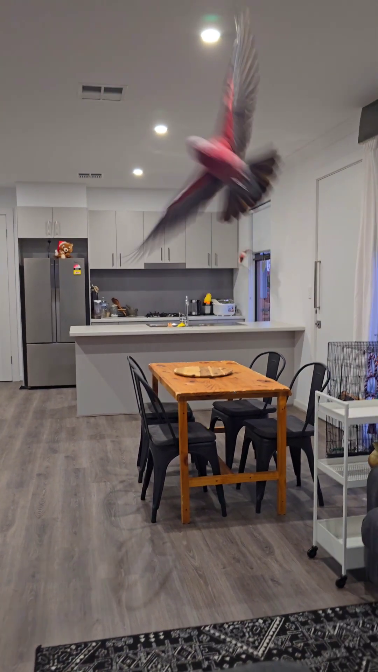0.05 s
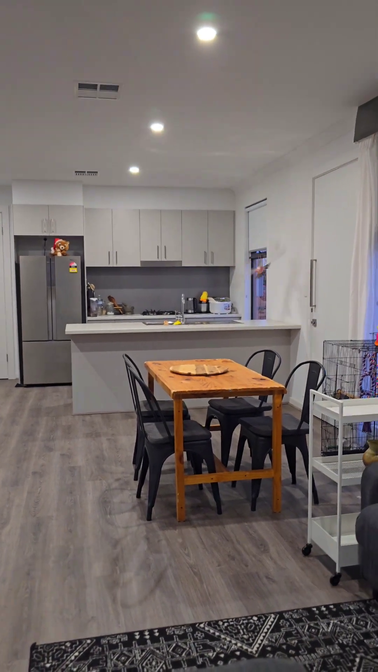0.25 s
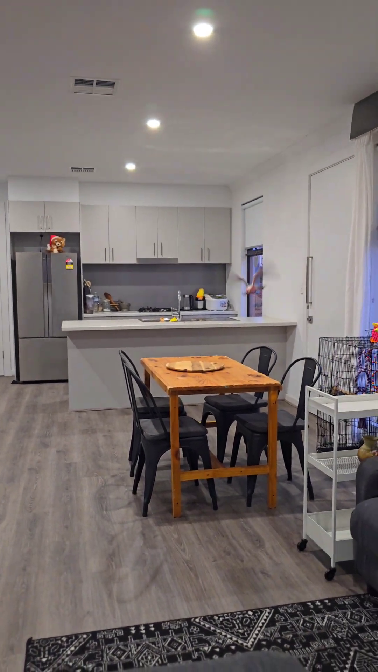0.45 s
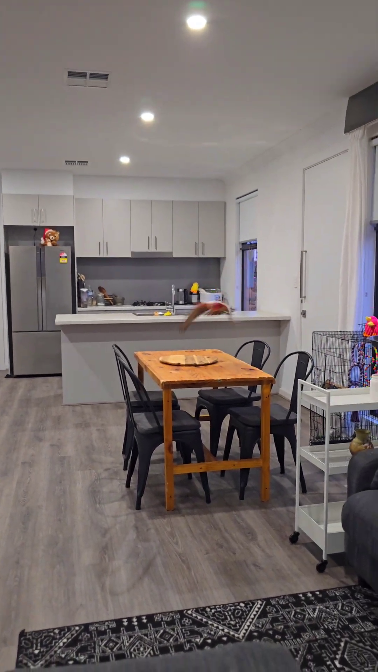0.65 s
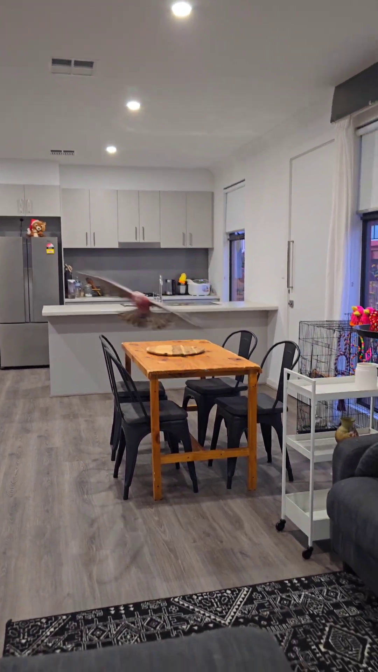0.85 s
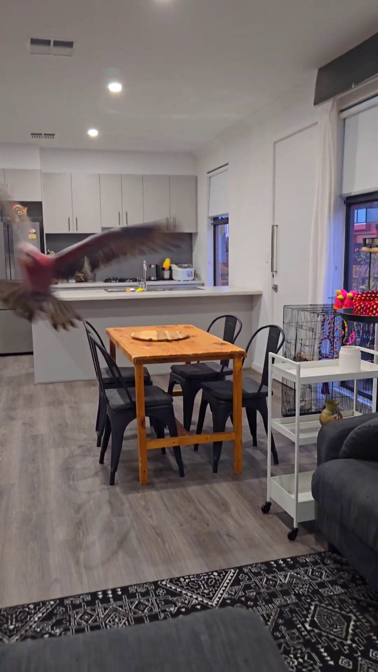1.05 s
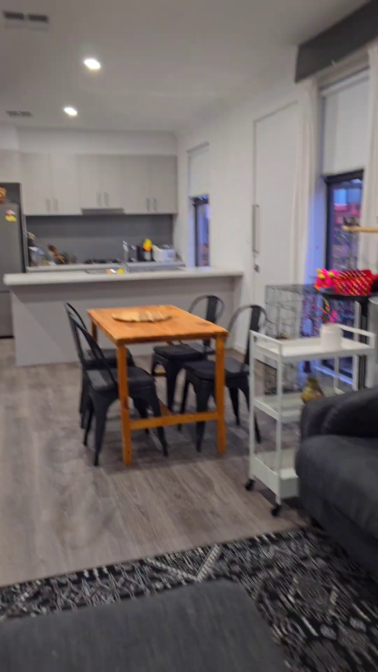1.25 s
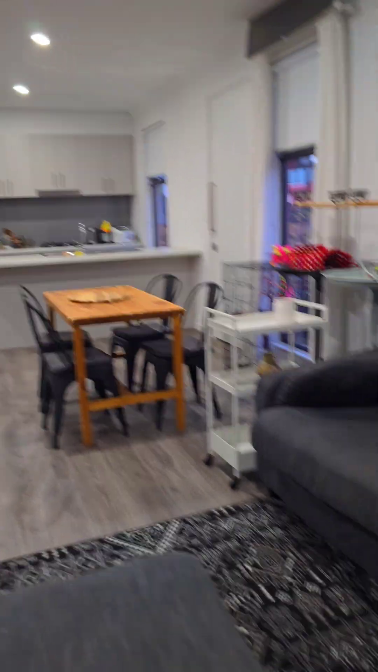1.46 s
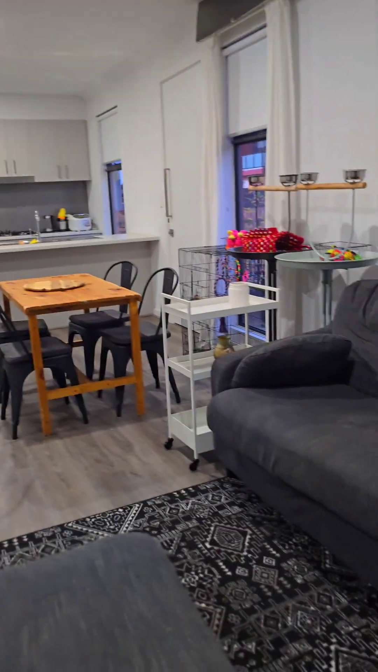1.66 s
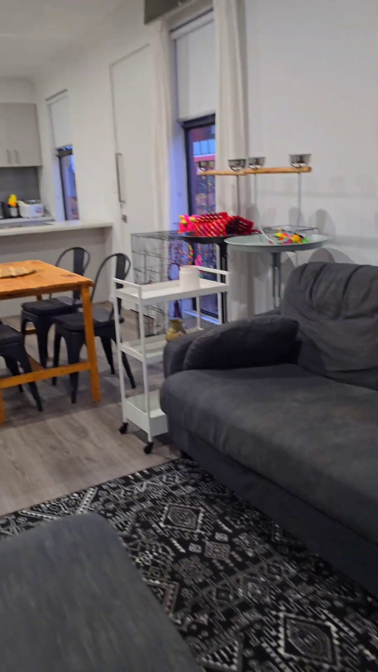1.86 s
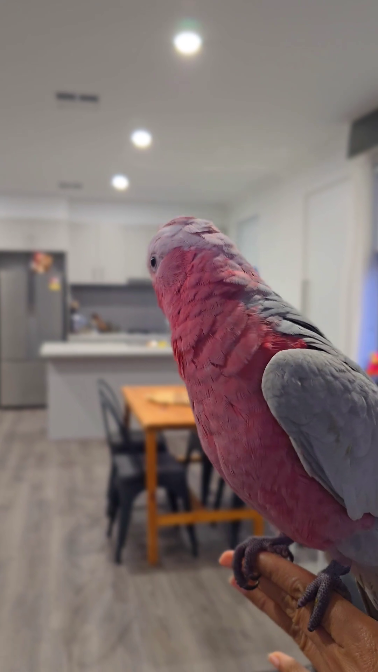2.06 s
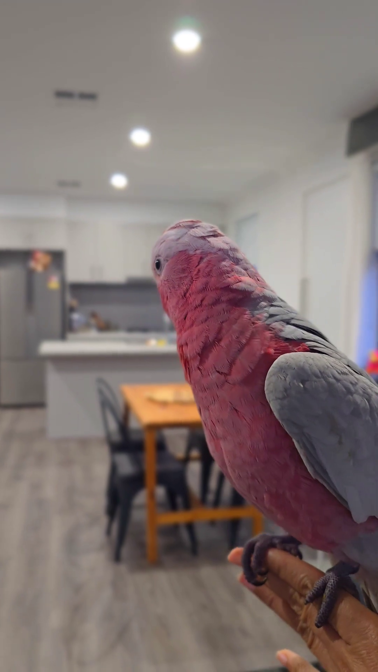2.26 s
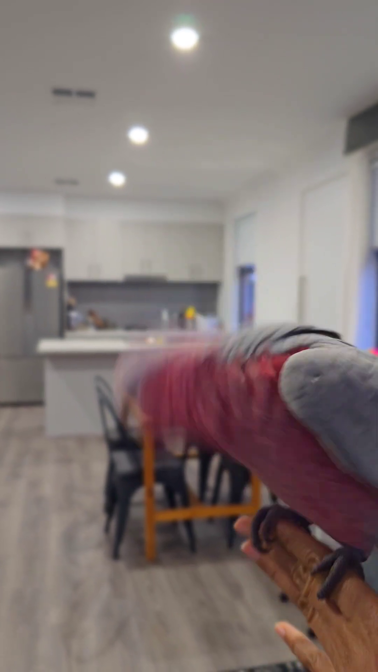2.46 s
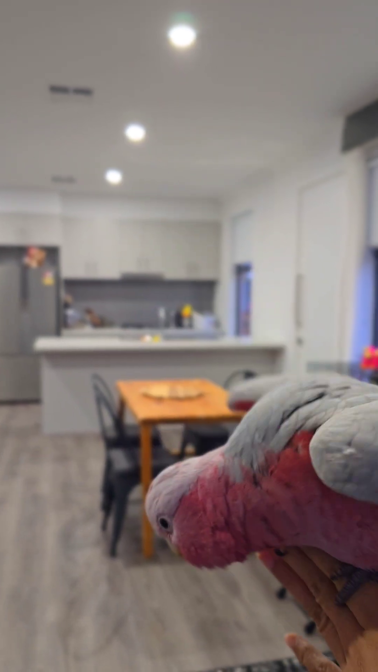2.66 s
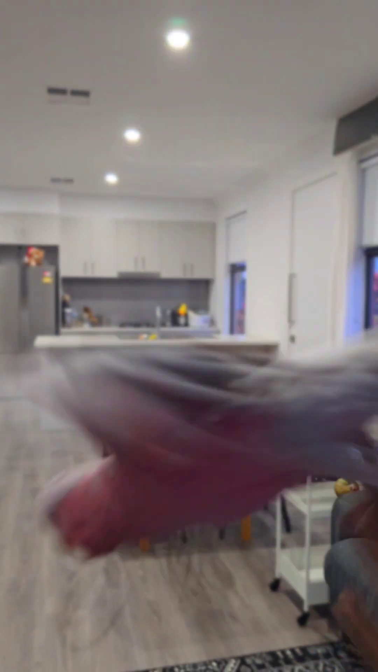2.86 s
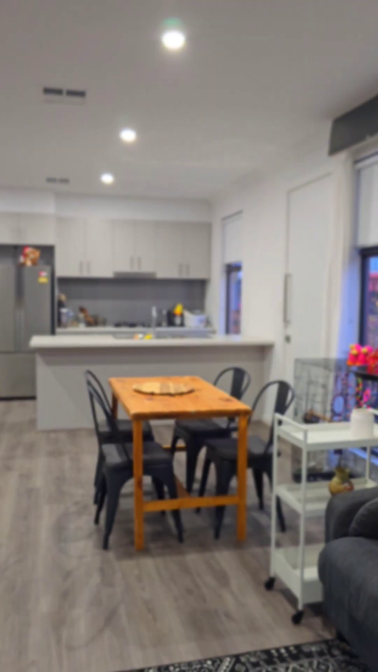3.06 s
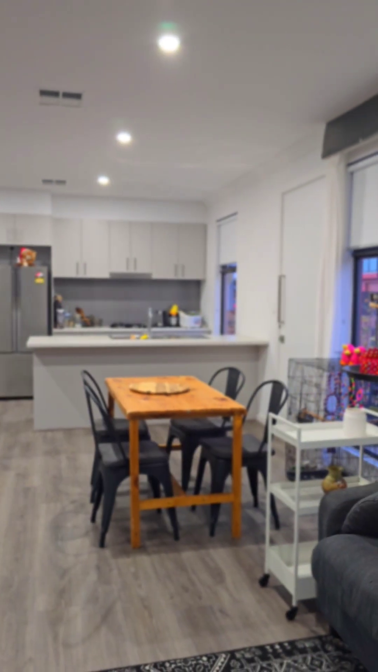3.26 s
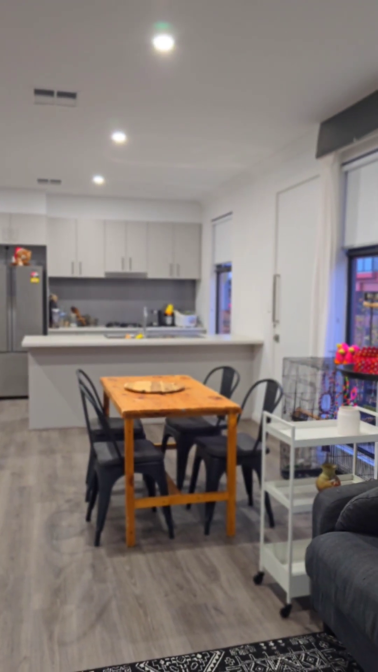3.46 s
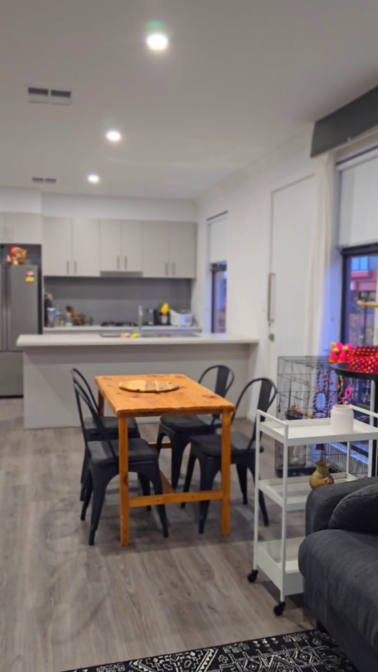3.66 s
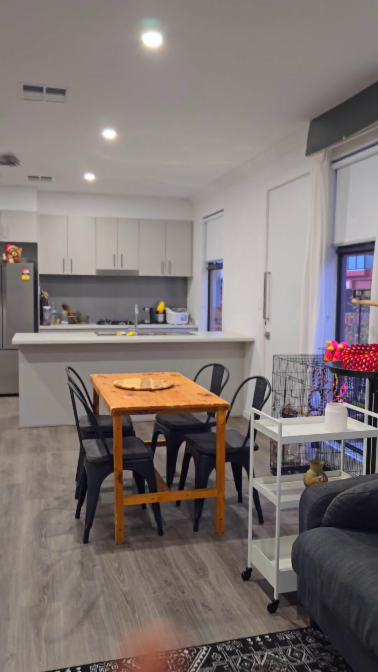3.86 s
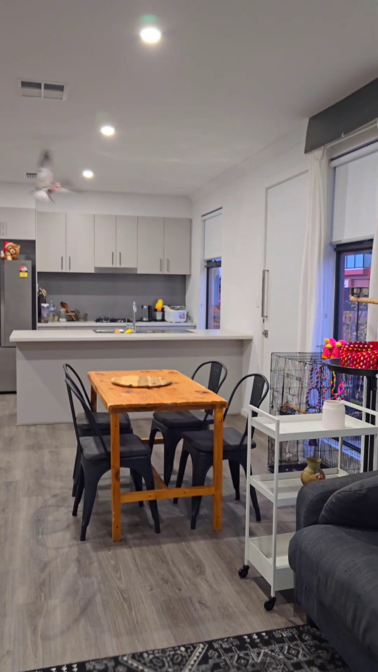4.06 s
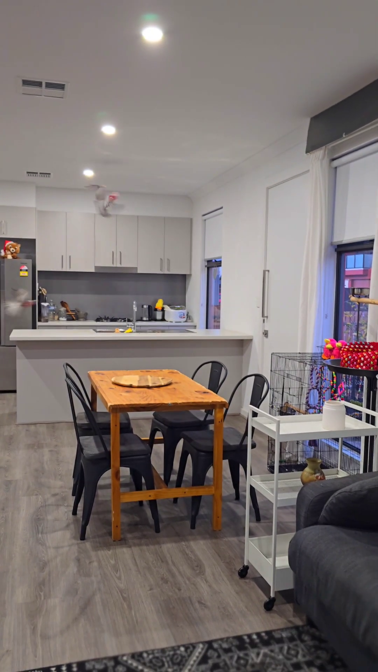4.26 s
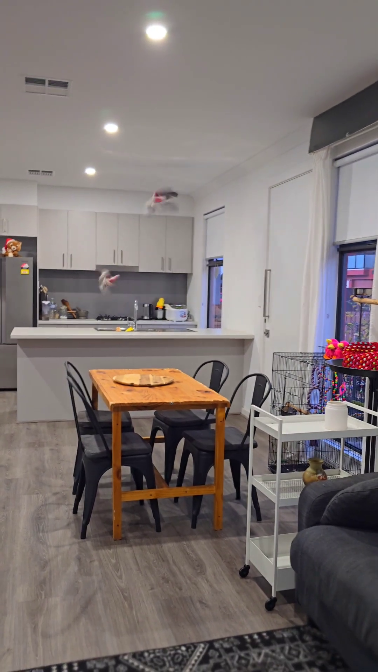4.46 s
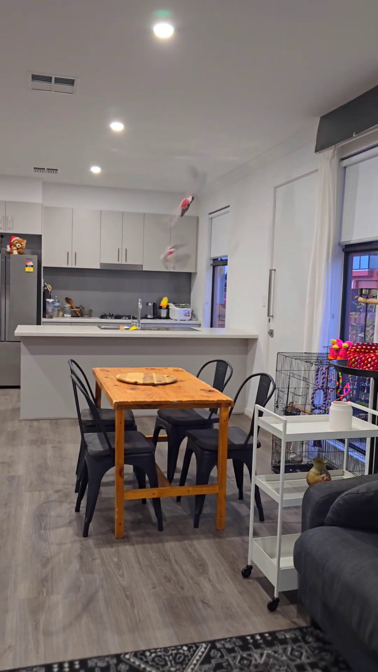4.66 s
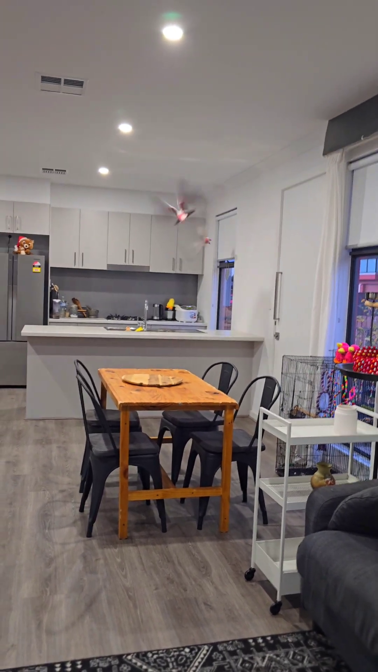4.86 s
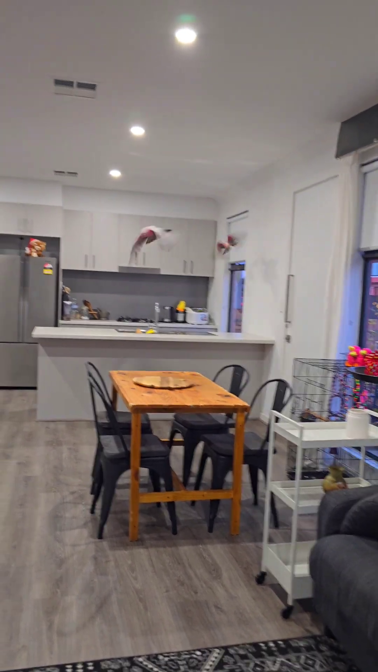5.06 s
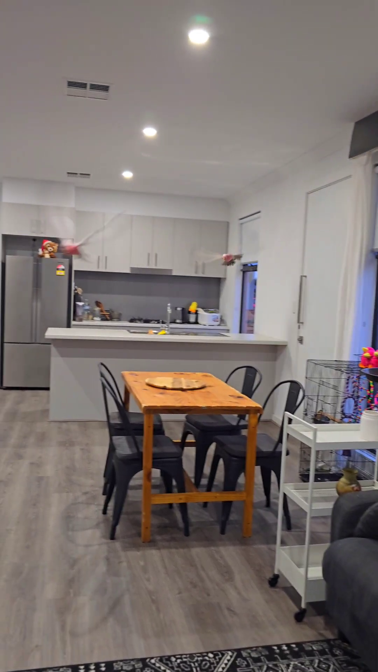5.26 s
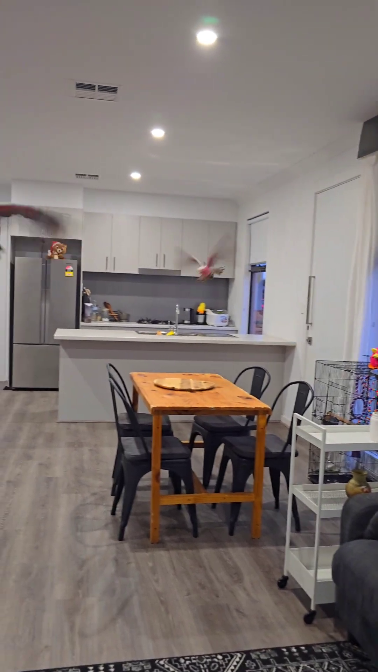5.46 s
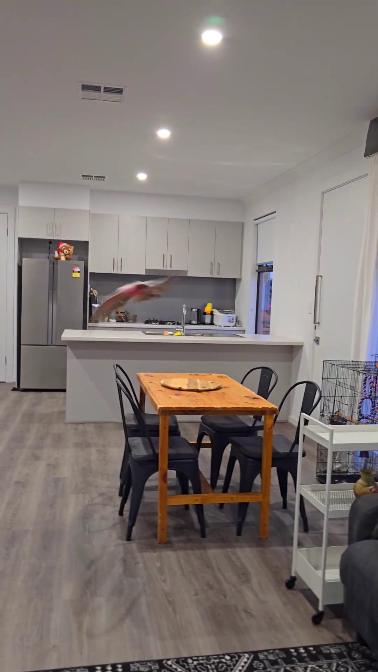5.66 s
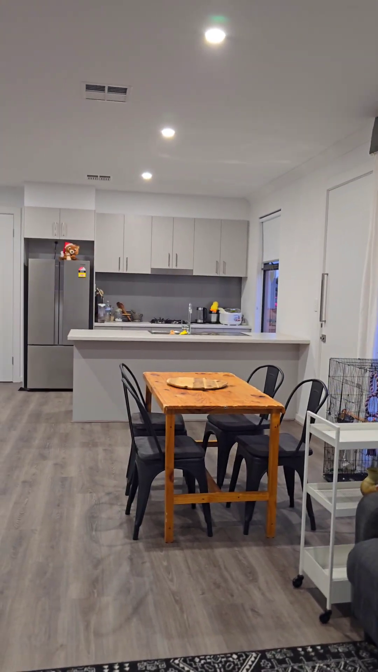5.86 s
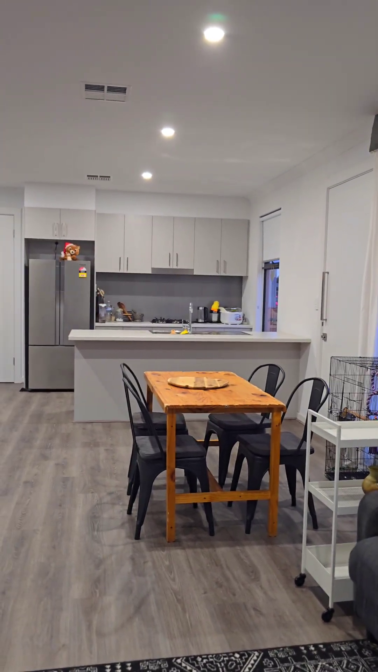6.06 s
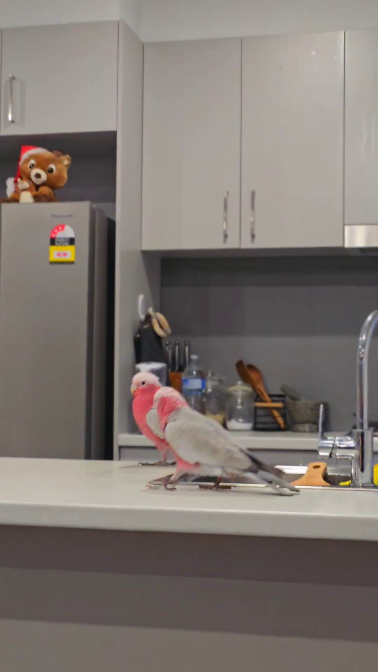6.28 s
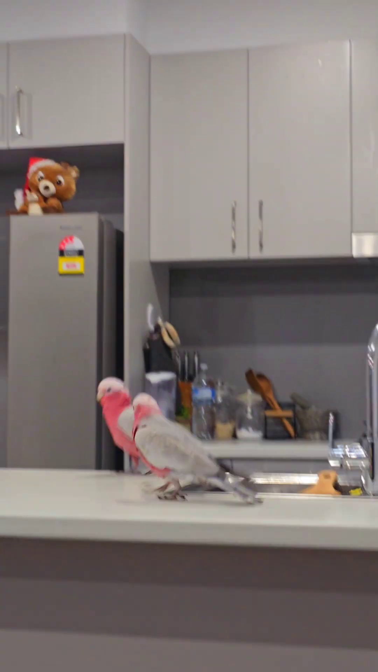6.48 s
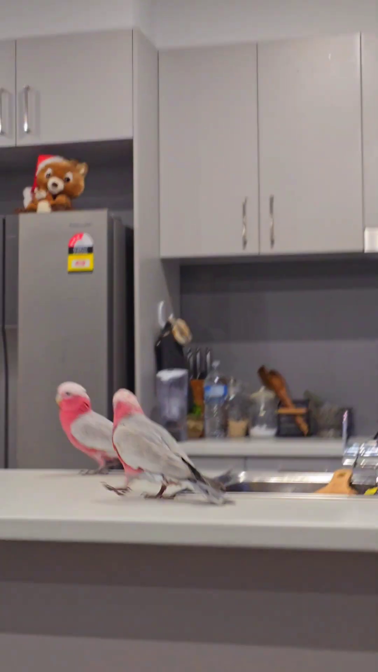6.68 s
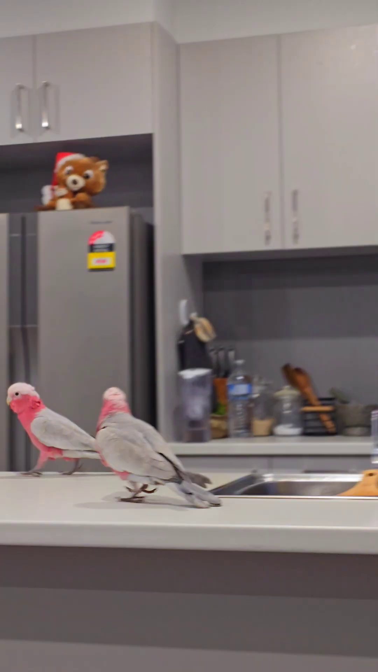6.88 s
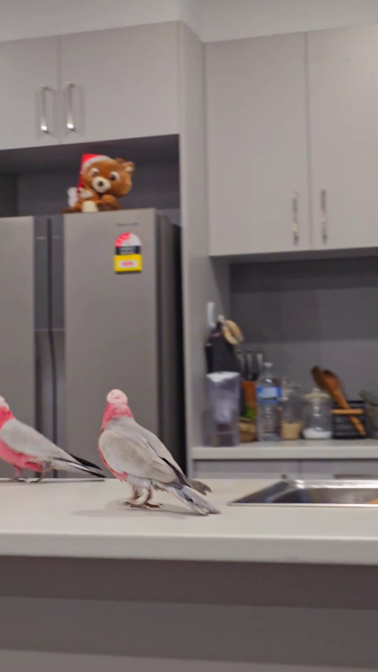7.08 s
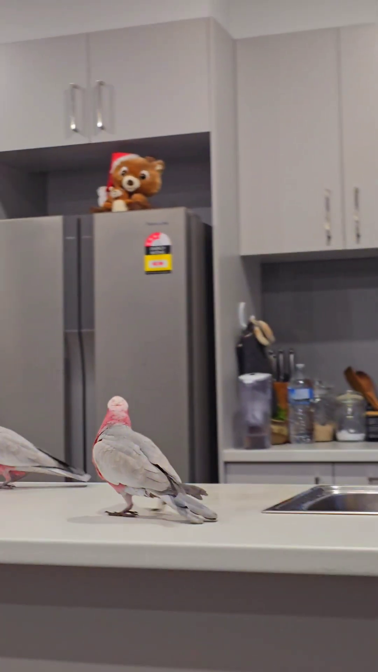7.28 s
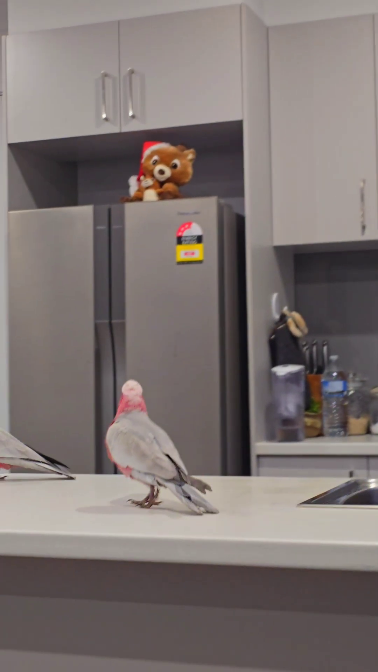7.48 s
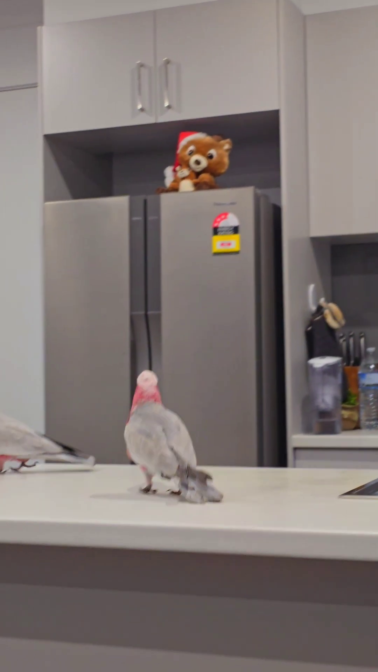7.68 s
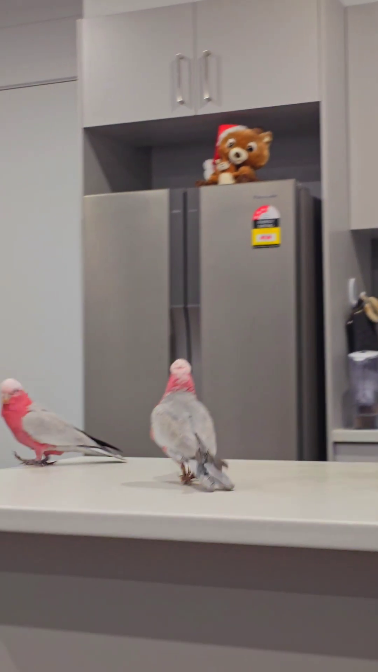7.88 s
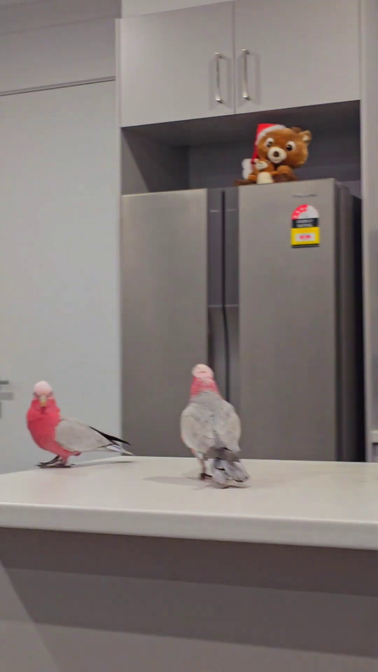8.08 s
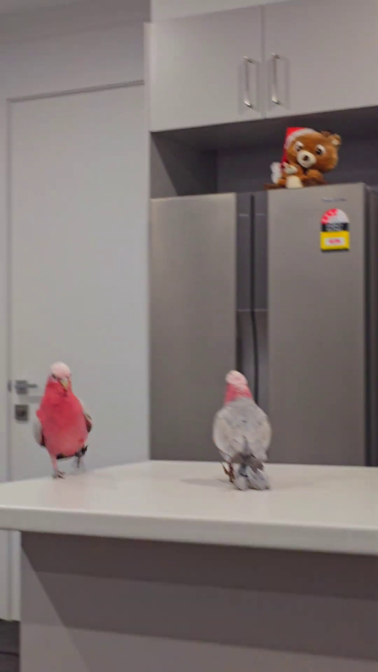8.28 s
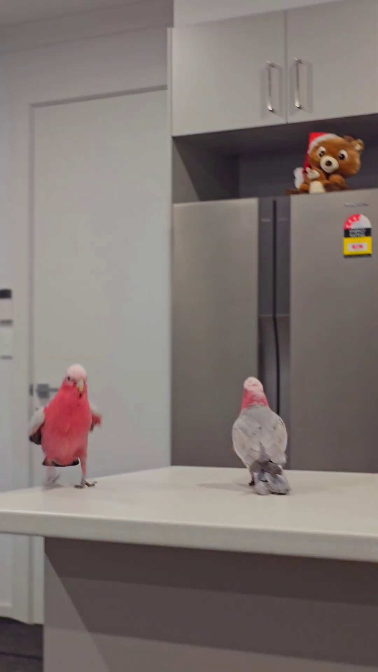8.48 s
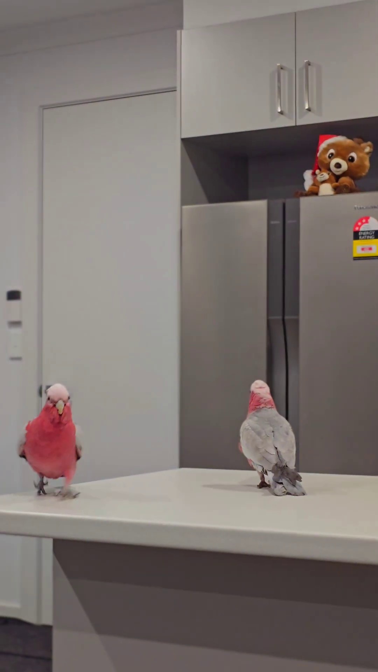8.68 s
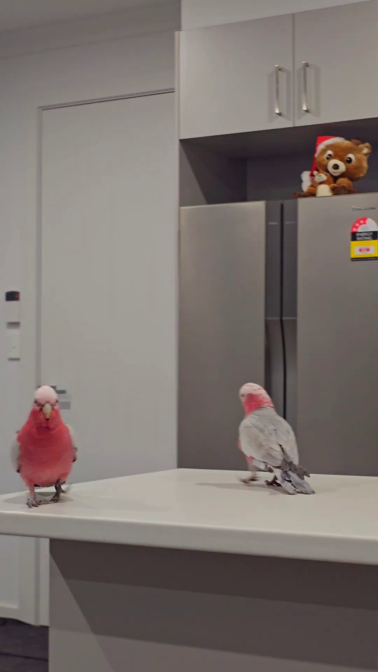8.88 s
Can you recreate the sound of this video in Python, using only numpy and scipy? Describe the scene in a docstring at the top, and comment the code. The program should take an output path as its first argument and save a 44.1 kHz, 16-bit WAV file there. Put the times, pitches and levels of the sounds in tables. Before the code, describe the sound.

A short parrot cry and fluttering wings open in a reverberant kitchen and living room. A whistling bird lands close to the hand-held microphone with air thumps and claw taps. It takes off and harsh, rasping screeches repeat as wings whirr around. Then calls stop, leaving quiet room air, faint foot scuffs, a few wooden knocks and dull thuds.

```python
"""A short cry amid whirring wings, then galahs screech as they fly about a hard-walled kitchen and living room.
Most screeches follow a low croak; uneven puffs and a gliding tone excite windpipe resonances, rasp to whistle.
Wings whirr and hum as noise and tone, air buffets the microphone, and claws tap as a bird lands on a hand.
Rustles and scuffs are shaped noise; late knocks ring modes of wood; dull thuds are low noise bursts."""
import sys
import numpy as np
from scipy import signal
from scipy.fft import rfft, irfft, next_fast_len
from scipy.io import wavfile
from scipy.ndimage import uniform_filter1d, minimum_filter1d

SR = 44100
rng = np.random.default_rng(int(sys.argv[2]) if len(sys.argv) > 2 else 0)


def dump_mix(stems):
    """Bounce the given channels to the path in sys.argv[1] as a 16-bit WAV at rate SR."""
    frames = np.atleast_2d(stems).T  # one column per channel
    limited = np.clip(frames, -1, 1)  # hard clip at full scale
    pcm = np.round(limited * 32767).astype(np.int16)
    wavfile.write(sys.argv[1], SR, pcm)


N = 393813
TIME = np.arange(N) / SR


def from_db(db):
    """Decibels to amplitude gain."""
    return 10 ** (np.asarray(db) / 20)


def rms_one(x):
    """Scale to unit power."""
    return x / np.sqrt(np.mean(x ** 2) + 1e-20)


def in_time(rows, t=TIME):
    """Interpolate each column of a curve at times t."""
    s, *columns = np.transpose(rows)
    return [np.interp(t, np.sort(s), column) for column in columns]


def at_hz(points, hz):
    """Interpolate a spectrum on a log-frequency axis."""
    f, value = np.transpose(points)
    return np.interp(np.log(np.maximum(hz, 1)), np.log(f), value)


def noise(colour, size=N):
    """Unit-power noise with the given spectrum."""
    padded = next_fast_len(size)
    hz = np.fft.rfftfreq(padded, 1 / SR)
    spectrum = rfft(rng.standard_normal(padded)) * from_db(at_hz(colour, hz))
    return rms_one(irfft(spectrum, padded)[:size])


def wide_noise(colour, alike, size=N):
    """Stereo noise; alike is the power share common to both channels."""
    common = np.sqrt(alike) * noise(colour, size)
    return common + np.sqrt(1 - alike) * np.array([noise(colour, size), noise(colour, size)])


def drift(rate_hz, size=N):
    """Unit-power random curve: straight lines between values drawn at rate_hz."""
    at = np.arange(size) * rate_hz / SR
    count = int(at[-1]) + 2
    return rms_one(np.interp(at, np.arange(count), rng.standard_normal(count)))


def hops(rate_hz, size):
    """Random level of spread 1 that holds, then jumps, about rate_hz times a second."""
    return rng.standard_normal(size + 1)[np.cumsum(rng.random(size) < rate_hz / SR)]


def butter(x, hz, kind, order=2):
    """Causal Butterworth low- or high-pass."""
    sos = signal.butter(order, np.clip(hz, 10, .45 * SR), kind, fs=SR, output="sos")
    return signal.sosfilt(sos, x)


def pan(db):
    """Left and right gains of constant total power; db = left minus right."""
    gains = from_db(np.array([db, -db]).reshape(2, -1) / 2)
    return gains / np.sqrt(np.mean(gains ** 2, axis=0))


def add(track, s, sound):
    """Mix a sound in at time s."""
    i = max(round(s * SR), 0)
    track[..., i:i + sound.shape[-1]] += sound[..., :N - i]


def burst(colour, rise_s, t60):
    """Half a second of noise with a smooth rise and exponential decay."""
    t = TIME[:SR // 2]
    return noise(colour, len(t)) * (1 - np.exp(-t / rise_s)) * from_db(-60 * t / t60)


def spells(rows, rise_s, fall_s, fade_db_per_s=0):
    """Gain of spells that swell, hold while fading, and die away; overlaps add in power."""
    power = 0
    for s, length_s, db in rows:
        before, after = np.maximum(s - TIME, 0), np.maximum(TIME - s - length_s, 0)
        outside = before / rise_s + after / fall_s
        held_db = db - fade_db_per_s * np.clip(TIME - s, 0, length_s)
        power = power + (from_db(held_db) * np.exp(-np.minimum(outside, 20))) ** 2
    return np.sqrt(power)


RASP_AIR, RASP_JITTER = .15, .014   # air gain beside unit-power clicks; rate jitter as a share


def puffs(hz, uneven_db):
    """One click of uneven strength per cycle, with a little air while the syrinx is open."""
    size = len(hz)
    cycles = np.cumsum(hz * (1 + RASP_JITTER * drift(500, size))) / SR
    clicks = np.diff(np.floor(cycles), prepend=-1) * from_db(uneven_db * drift(700, size))
    opening = (1 + np.cos(2 * np.pi * cycles)) / 2
    return rms_one(clicks) + RASP_AIR * rng.standard_normal(size) * opening


# windpipe and beak resonances: f/Hz, width/Hz, level/dB
THROAT = [(2930, 490, -7), (4030, 290, 1), (5306, 1000, -6.5), (6410, 530, -4.5), (7233, 380, -7),
          (8764, 770, -8), (10170, 790, -13.5), (12290, 1200, -17), (15500, 870, -27)]


def throat(x, resonances=THROAT):
    """Parallel two-pole resonances of alternating sign."""
    out = 0
    for k, (hz, width_hz, db) in enumerate(resonances):
        r = np.exp(-np.pi * width_hz / SR)
        zeros = [(1 - r * r) / 2, 0, (r * r - 1) / 2]
        poles = [1, -2 * r * np.cos(2 * np.pi * hz / SR), r * r]
        out = out + (-1) ** k * from_db(db) * signal.lfilter(zeros, poles, x)
    return out


# harmonics 2, 3, 4 before the windpipe: level/dB
OVERTONES_DB = [-2.5, -6.5, -11.5]
# side tones at -1, +1, +2, +3 steps from the whistle: level/dB
SIDE_TONES_DB = [-2, -3, -15, -16.5]


def whistle(hz, rough, overtone_db, step_hz=850, jitter=0.018, wander=.021, shimmer_db=5, stray=0.015,
            flicker_db=5):
    """The membrane's tone and overtones; driven rough, it adds unsteady side tones, coloured by the windpipe."""
    size = len(hz)
    shake = rough * (jitter * drift(1800, size) + wander * drift(220, size))
    phase = 2 * np.pi * np.cumsum(hz * (1 + shake)) / SR
    partials = 0
    for harmonic, db in enumerate(OVERTONES_DB, start=2):
        gain = from_db(db + overtone_db + flicker_db * drift(60, size))
        partials = partials + gain * np.sin(harmonic * phase)
    for steps, db in zip((-1, 1, 2, 3), SIDE_TONES_DB):
        offset_hz = steps * step_hz + stray * hz * drift(150, size)
        offset = 2 * np.pi * np.cumsum(offset_hz) / SR
        partials = partials + rough * from_db(db + flicker_db * drift(90, size)) * np.sin(phase + offset)
    shimmer = from_db(shimmer_db * rough * drift(400, size))
    return rms_one((np.sin(phase) + throat(partials)) * shimmer)


FLUTTER_RATIO = 4.6   # tone cycles per puff


def rasp(hz, growl_db=-22, bright_db=-23, grain_db=4.5):
    """A flutter that follows the pitch lets puffs into the windpipe: a ragged stack of strands."""
    flow = puffs(hz / FLUTTER_RATIO, uneven_db=5)
    growl = from_db(growl_db) * butter(butter(flow, 550, "high"), 2900, "low")
    voice = butter(throat(flow) + from_db(bright_db) * flow, 2600, "high", order=4) + growl
    even = voice / np.sqrt(np.abs(uniform_filter1d(voice ** 2, size=130)) + 1e-9)   # level out the puffs
    return rms_one(even * from_db(grain_db * drift(250, len(hz))))


# calling bird's place: t/s, direct level/dB, room level/dB, direct left-right/dB, overtone level/dB
PLACE = [(0, -0.5, 7, 16, 8), (.35, -10, -3, 3, 1.5), (1.36, -3.5, -17, 2, -6.5),
         (1.46, 4.5, -12.5, 10, -11), (1.53, 1, -14, 18, -22.5), (2.87, 0, -10, 9.5, 3.5),
         (3.14, 2, -1, 5.5, -0.5), (3.43, -7, -8.5, 15, 1), (3.75, 5, 8, 7, 1.5), (4.3, -4.5, 3, 18, 1.5),
         (4.75, -5.5, -2, 8, 3.5), (5.2, -3.5, -1.5, 8.5, 0.5), (5.67, 0.5, -3, 15, 4.5),
         (5.9, -0.5, -10, 15, 11)]


def syrinx(t, hz, level_db, rough, rasp_db=-1, rasp_growth=1.87, attack_s=0.0081, release_s=0.012):
    """The voice: roughness trades whistle for rasp."""
    rough = np.clip(rough, 0, 1)
    overtone_db = in_time(PLACE, t)[3]
    tone = np.sqrt(1 - rough ** 2) * whistle(hz, rough, overtone_db)
    rasping = from_db(rasp_db) * rough ** rasp_growth * rasp(hz)
    edges = np.clip(np.minimum((t - t[0]) / attack_s, (t[-1] - t) / release_s), 0, 1)
    return edges * from_db(level_db) * (tone + rasping)


LEAP_S, CLEARING_S = .005, 0.01   # jump to the cry; decay of the rasp's roughness
RASP_RISE_HZ, RASP_RISE_BEND, RASP_SWELL_BEND = 483.6, 1.6, 2   # fastest at first
CRY_BEND, CRY_ARCH_DB = 1.4, 4   # glide flattens towards its end; both ends softer
CRY_WAVER, CRY_HOP, HOPS_PER_S = .007, .009, 130   # waver and hop as shares of pitch
STRAIN_HZ, STRAIN_S = 229, .005   # upward pull around the leap and at the end of a rising cry


def screech(s, rasp_s, rasp_hz, rasp_db, rasp_swell_db, rasp_rough,
            cry_s, first_hz, last_hz, cry_db, swell_db, cry_rough):
    """A climbing rasp leaps into a gliding, hopping cry as its roughness settles."""
    t = np.arange(-rasp_s, cry_s, 1 / SR)   # zero at the leap
    to_go, after = np.maximum(-t / rasp_s, 0), np.maximum(t, 0)
    along, leapt = np.minimum(after / cry_s, 1), np.minimum(after / LEAP_S, 1)
    unsteady = 1 + CRY_WAVER * drift(110, len(t)) + CRY_HOP * hops(HOPS_PER_S, len(t))
    glide_hz = (last_hz + (first_hz - last_hz) * (1 - along) ** CRY_BEND) * unsteady
    glide_hz = glide_hz + STRAIN_HZ * (last_hz > first_hz) * np.exp((t - cry_s) / STRAIN_S)
    climb_hz = rasp_hz - RASP_RISE_HZ * to_go ** RASP_RISE_BEND
    climb_hz = climb_hz + STRAIN_HZ * np.exp(-np.abs(t) / STRAIN_S)
    climb_db = rasp_db - rasp_swell_db * to_go ** RASP_SWELL_BEND
    arch_db = cry_db + swell_db * (along - .5) - CRY_ARCH_DB * (2 * along - 1) ** 2
    hz = (1 - leapt) * climb_hz + leapt * glide_hz
    level_db = (1 - leapt) * climb_db + leapt * arch_db
    rough = cry_rough + (rasp_rough - cry_rough) * np.exp(-after / CLEARING_S)
    return syrinx(s + rasp_s + t, hz, level_db, rough)


WHISTLE_ARCH_DB = 1   # ends below middle


def glide(s, length_s, first_hz, last_hz, db, rough):
    """A single register swells and fades while its pitch slides."""
    t = np.arange(0, length_s, 1 / SR)
    hz = np.linspace(first_hz, last_hz, len(t))
    level_db = db - WHISTLE_ARCH_DB * (2 * t / length_s - 1) ** 2
    return syrinx(s + t, hz, level_db, np.full(len(t), rough))


# rasp: t/s, length/s, top f/Hz, level/dB, swell/dB, roughness/0-1;
# cry: length/s, first f/Hz, last f/Hz, level/dB, swell/dB, roughness/0-1
SCREECHES = [ (0, 0.0032, 3610, -10, -12, 0.3, 0.032, 3857, 3813, -20, -9, 0.2),
             (0.236, 0.024, 3612, -19, 5.5, 0.77, 0.062, 3660, 4330, -11.5, 2.5, 0.25),
             (1.344, .038, 3198, -5, 3.5, 0.51, 0.052, 4020, 4410, -9.5, -2.5, 0.47),
             (2.842, 0.035, 3050, -8.5, 4, 0.42, 0.037, 3750, 4130, -5, -6, 0.32),
             (3.063, .03, 3715, -15, 13, 0.86, .125, 3586, 4537, -17.5, 0, 0.1),
             (3.36, 0.04, 3257, -14, 11, 0.72, 0.088, 3878, 4245, -10.5, -19, 0.24),
             (3.688, 0.026, 3690, -27.5, 10, 0.83, 0.054, 3765, 4180, -22.5, -3, 0.15),
             (4.212, 0.032, 3294, -20.5, 8.5, 0.51, 0.076, 3645, 4194, -13, -2, 0),
             (4.448, 0.046, 3342, -15.5, 12, 0.77, 0.14, 3922, 4058, -13, -8, 0.38),
             (4.687, 0.021, 3745, -20.5, 13.5, 0.96, 0.067, 3880, 4184, -12, -3, 0.18),
             (4.905, .025, 3535, -16.5, 21.5, 0.8, 0.049, 3657, 3860, -11, 2.5, 0.32),
             (5.153, 0.036, 3125, -12.5, 15.5, 0.85, 0.029, 3764, 4217, -9, 17.5, 0),
             (5.367, 0.042, 3363, -9.5, 22, 0.83, 0.097, 3750, 4076, -9, -1, 0.3),
             (5.599, 0.029, 3362, -14.5, 29, 0.79, 0.083, 3604, 4063, -10.5, 3.5, 0.07),
             (5.81, 0.039, 3180, -11.5, 18.5, 0.75, 0.06, 4110, 3845, -6, 9, 0.11)]
# breaks into a top register: t/s, length/s, first f/Hz, last f/Hz, level/dB, roughness/0-1
WHISTLES = [(0.32, 0.092, 5290, 5147, -17.5, 0.55), (2.904, 0.045, 5405, 5130, -7, 0.24),
            (3.215, 0.07, 5086, 5300, -19.5, 0.62), (3.754, 0.044, 5307, 5150, -29, 0.5),
            (4.755, 0.051, 5230, 5093, -14.5, 0.44), (4.969, .06, 5050, 5273, -16, 0.4),
            (5.215, 0.024, 5137, 5053, -14.5, 0.4), (5.703, 0.014, 5370, 5400, -17, 0.1)]
# other side of the syrinx, or a second bird: t/s, length/s, first f/Hz, last f/Hz, level/dB, roughness/0-1
SECOND_VOICES = [(0, 0.03, 3410, 3196, -29.5, 0.42), (0, 0.021, 4750, 4675, -34.5, 0.3),
                 (.29, 0.058, 3525, 3660, -26, 0.42), (1.342, 0.027, 3260, 3760, -12, 0.42),
                 (1.381, 0.062, 2920, 3070, -21.5, .5), (3.1, 0.042, 3853, 3830, -19, 0.13),
                 (3.15, 0.056, 3950, 4130, -23, 0.13), (3.362, 0.098, 3075, 3210, -14, 0.37),
                 (4.967, .05, 3756, 3665, -19, 0.5), (5.42, 0.071, 4250, 3725, -13.5, 0.44),
                 (5.434, 0.067, 5000, 5200, -29, 0.5), (5.836, 0.035, 3130, 3145, -20, 0.12),
                 (5.84, 0.04, 4680, 4930, -21.5, 0.3)]
# drawn-out whistle of the landing bird, one curve: t/s, f/Hz, level/dB, roughness/0-1
LANDING_WHISTLE = [(1.429, 5700, -21.5, 0.7), (1.455, 5860, -22, 0.65), (1.484, 5650, -15, 0.3),
                   (1.508, 5510, -7.5, 0.05), (1.525, 5270, -12.5, 0.09), (1.573, 5430, -16.5, .1),
                   (1.595, 5610, -15, .05), (1.615, 5534, -15.5, 0.02)]


def calls():
    """Screeches and whistles as they leave the beak."""
    voice = np.zeros(N)
    for row in SCREECHES:
        add(voice, row[0], screech(*row))
    for row in WHISTLES + SECOND_VOICES:
        add(voice, row[0], glide(*row))
    t = np.arange(LANDING_WHISTLE[0][0], LANDING_WHISTLE[-1][0], 1 / SR)
    add(voice, t[0], syrinx(t, *in_time(LANDING_WHISTLE, t)))
    return voice


# reverberation time: f/Hz, t60/s
ROOM_T60 = [(100, 0.94), (500, 0.53), (1400, 0.66), (4000, 0.63), (8000, 0.54), (15000, .36)]
# reverberation balance: f/Hz, left-right/dB
ROOM_SIDE = [(250, 2.5), (1100, -1.5), (4000, 3), (8000, -0.5), (12000, 1.5)]


def room(x, gap_s=0.00086, build_s=0.002, bass_alike=0.25, alike_hz=1500):
    """Dense reflections that die band by band; the sides share part of the bass, less above."""
    t = TIME[:SR]
    hz = np.fft.rfftfreq(len(t), 1 / SR)
    alike = bass_alike / (1 + (hz / alike_hz) ** 2)
    white = rfft(rng.standard_normal((3, len(t))))
    spectrum = np.sqrt(alike) * white[2] + np.sqrt(1 - alike) * white[:2]
    spectrum = spectrum * pan(at_hz(ROOM_SIDE, hz))
    centres = np.geomspace(100, 15000, 12)
    tail = 0
    for centre, share in zip(centres, np.eye(len(centres))):
        band = irfft(spectrum * at_hz(np.c_[centres, share], hz), len(t))
        tail = tail + band * from_db(-60 * t / at_hz(ROOM_T60, centre))
    tail = tail * np.clip((t - gap_s) / build_s, 0, 1)
    return signal.fftconvolve(x[None], rms_one(tail) / np.sqrt(len(t)), axes=1)[:, :N]


CROAK_SIDE_DB = -4.5   # left-right: the microphone's body hardly shades such low sounds


def galahs(lag_s=.00025, wall_s=.0021, wall_db=-5):
    """All calls: direct (left side first), off a near wall on the right, and through the room."""
    high, low = calls(), croaks()
    direct_db, room_db, side_db, _ = in_time(PLACE)
    left, right = high * pan(side_db) + low * pan(CROAK_SIDE_DB)
    echo = from_db(wall_db) * np.interp(TIME - wall_s, TIME, right)
    right = np.interp(TIME - lag_s, TIME, right) + echo
    return np.array([left, right]) * from_db(direct_db) + room((high + low) * from_db(room_db))


# spells of flapping: t/s, length/s, level/dB
FLIGHTS = [(0, 0.64, -52), (.88, 0.14, -53), (1.3, 0.55, -51.5), (2.85, 0.23, -51), (3.15, 0.64, -44),
           (4.3, 0.37, -49.5), (4.55, 1.25, -45), (6.07, 0.19, -54.5), (6.3, 0.04, -52.5)]


def flapping():
    """Gain of the flight spells, fading as they last."""
    return spells(FLIGHTS, rise_s=0.14, fall_s=0.18, fade_db_per_s=6.5)


WING_HUM_HZ, WING_HUM_SWING_HZ, WING_HUM_DB = 249, 34.98, -2   # level relative to whirr
# whirr spectrum: f/Hz, level/dB
WING_COLOUR = [(80, -22), (160, -4), (240, 1), (330, -5.5), (480, -9), (1000, -16), (2500, -22),
               (12000, -31)]


def wings(beats_per_s=8, beat_db=4.5):
    """Noise whirrs in beats while the flight feathers hum, higher in each stroke."""
    beat_hz = beats_per_s * (1 + 0.27 * drift(5.1))
    beat = np.sin(2 * np.pi * np.cumsum(beat_hz) / SR)
    hum_hz = WING_HUM_HZ + WING_HUM_SWING_HZ * (beat / 2 + drift(45))
    hum = rms_one(np.sin(2 * np.pi * np.cumsum(hum_hz) / SR) * from_db(7.3 * drift(35)))
    whirr = wide_noise(WING_COLOUR, alike=0.65)
    return flapping() * from_db(beat_db * beat) * (whirr + from_db(WING_HUM_DB) * hum)


DRAUGHT_DB, BUFFET_SIDE_DB = -4, 0.5   # air stirred by flapping, relative to whirr; left-right
# buffets of air on the microphone, brief gusts and longer, weaker stirring as the bird settles:
# t/s, hold/s, level/dB
BUFFETS = [(1.35, 0.0082, -30.5), (1.455, .01, -36.5), (1.555, 0.018, -24.5), (1.63, 0.497, -44.5),
           (2.945, 0.033, -25), (3.315, 0.029, -35), (3.55, 0.23, -47.5), (4.6, 0.069, -49),
           (5.65, 0.17, -49)]
# buffet spectrum: f/Hz, level/dB
BUFFET_COLOUR = [(15, -8.5), (30, 0), (50, 2.5), (80, -8.5), (130, -15.5), (250, -24), (600, -47),
                 (2000, -62)]


def buffets():
    """Air buffets the microphone as low noise: a draught with the flapping, brief gusts, longer stirring."""
    push = np.hypot(spells(BUFFETS, rise_s=0.028, fall_s=0.01), from_db(DRAUGHT_DB) * flapping())
    return push * wide_noise(BUFFET_COLOUR, alike=0.86) * pan(BUFFET_SIDE_DB)


AIR_DB = -63
# still-room spectrum: f/Hz, level/dB
AIR = [(30, -17), (90, -15.5), (140, 1), (300, -1), (700, -6), (1200, -14), (1600, -14.5), (2100, -19),
       (2700, -31), (15000, -47)]


def still_air():
    """Still room air: steady, mostly low noise."""
    return from_db(AIR_DB) * wide_noise(AIR, alike=0.3)


# hand-held microphone rumble: t/s, length/s, level/dB
HANDLING = [(0, 0.36, -50.5), (6.5, 1.92, -63.5)]
# rumble spectrum: f/Hz, level/dB
HANDLING_COLOUR = [(15, -8.5), (32, -2), (55, -6), (90, -24.5), (300, -45)]


def handling():
    """Rumble of the hand that holds the microphone."""
    return spells(HANDLING, rise_s=0.1, fall_s=.3) * wide_noise(HANDLING_COLOUR, alike=0.36)


CROAK_SWELL_DB = 5   # start to end
# half-closed beak resonances: f/Hz, width/Hz, level/dB
CROAK_THROAT = [(650, 530, -3.5), (1150, 540, 2), (1643, 350, 4), (3060, 480, 0.5), (3950, 500, -4.5),
                (7000, 2800, -18)]


def croak(length_s, first_hz, last_hz):
    """Slow, uneven puffs ring the half-closed beak and swell."""
    size = round(length_s * SR)
    flow = puffs(np.linspace(first_hz, last_hz, size), uneven_db=2.5)
    swell = from_db(CROAK_SWELL_DB * np.linspace(-.5, .5, size))
    return rms_one(throat(flow, CROAK_THROAT)) * swell * signal.windows.tukey(size, .3)


CROAK_GLIDE_HZ = 68.8   # starts this far below its pitch, ends as far above
# low croaks about the screeches: t/s, length/s, centre f/Hz, level/dB
CROAKS = [(0.189, 0.058, 675, -33.5), (0.371, 0.027, 761, -27), (1.336, 0.03, 615.5, -24),
          (2.827, .021, 576, -18.5), (3.039, 0.029, 681, -27), (3.216, 0.058, 893, -36),
          (3.325, 0.039, 684, -30.5), (3.67, 0.03, 619, -42), (4.19, 0.053, 643, -38.5),
          (4.429, 0.031, 649, -35.5), (4.67, 0.049, 682, -36), (4.902, 0.05, 634, -35),
          (5.133, 0.04, 620.7, -36.5), (5.36, 0.031, 633, -31.5), (5.59, 0.029, 660, -29),
          (5.801, 0.032, 680, -26.5)]


def croaks():
    """The low croaks, each gliding up through its pitch."""
    voice = np.zeros(N)
    for s, length_s, hz, db in CROAKS:
        add(voice, s, from_db(db) * croak(length_s, hz - CROAK_GLIDE_HZ, hz + CROAK_GLIDE_HZ))
    return voice


METAL_RING_S = .37
# single metallic mode: f/Hz, level/dB, t60/s
METAL_RING = (1400, -67, 12)


def metal_ring():
    """Something metallic rings on faintly after the first calls: one decaying sine."""
    hz, db, t60 = METAL_RING
    age = np.maximum(TIME - METAL_RING_S, 0)
    return from_db(db - 60 * age / t60) * np.sin(2 * np.pi * hz * age)


# soft hiss: t/s, length/s, level/dB
RUSTLES = [(1.29, 0.36, -48), (1.6, 0.47, -56), (2.2, 0.28, -60), (6.5, 0.83, -59.5), (7.35, 0.19, -54.5),
           (7.65, 0.54, -65.5), (8.35, 0.54, -65.5)]
# hiss spectrum: f/Hz, level/dB
RUSTLE_COLOUR = [(300, 5.5), (1500, -1), (3000, -1), (5300, -5.5), (8000, -4), (10000, -8.5), (12500, -4.5),
                 (15500, -4)]


def rustles():
    """Spells of soft, slightly unsteady hiss."""
    level = spells(RUSTLES, rise_s=0.071, fall_s=0.085, fade_db_per_s=4)
    return level * from_db(0.81 * drift(54)) * wide_noise(RUSTLE_COLOUR, alike=0.2)


# claws and feathers striking the hand: t/s, level/dB
CLAWS = [(1.539, -30.5), (1.585, -25.5), (1.643, -31), (1.693, -32.5), (1.723, -36), (1.772, -32.5),
         (1.794, -30.5), (1.822, -30.5), (1.924, -35), (1.965, -29.5), (2.086, -28.5), (2.986, -21.5)]
# tap spectrum: f/Hz, level/dB
CLAW_COLOUR = [(40, 6), (150, 10.5), (400, 2.5), (1500, -8), (2500, -19), (4000, -46.5), (15000, -20.5)]


def claws(side_db=8):
    """Claws tap as a bird grips the hand: brief noise bursts."""
    taps = np.zeros(N)
    for s, db in CLAWS:
        add(taps, s, from_db(db) * burst(CLAW_COLOUR, rise_s=0.001, t60=0.03))
    return taps * pan(side_db)


# feet and feathers: t/s, relative level/dB
SCUFFS = [(2.302, -49), (6.553, -40), (6.757, -38), (6.909, -40.5), (7.016, -39), (7.057, -39),
          (7.205, -40), (8.328, -43.5), (8.386, -40), (8.546, -40.5), (8.706, -41), (8.846, -33.5)]
# scuff spectrum: f/Hz, level/dB
SCUFF_COLOUR = [(500, -26), (2000, -12.5), (3800, -9.5), (5300, -3), (7000, -6.5), (8300, -2), (10000, -17),
                (12500, -4.5), (15500, -22)]


def scuffs():
    """Short brushes of noise made grainy by fast random level, direct and through the room."""
    out = np.zeros(N)
    for s, db in SCUFFS:
        add(out, s, from_db(db - 4.5) * burst(SCUFF_COLOUR, rise_s=0.0186, t60=0.079))
    out = out * from_db(6.9 * drift(300))
    return out * pan(-8.0) + from_db(2.5) * room(out)


# knocks on wood: t/s, relative peak level/dB, low-pass f/Hz
KNOCKS = [(7.335, -19, 10840), (7.633, -31, 1400), (7.825, -35.5, 1075), (8.448, -48, 900),
          (8.771, -39.5, 1990)]
# wood modes: f/Hz, level/dB, t60/s
KNOCK_MODES = [(192.8, -21, 0.24), (382, -6.5, 0.11), (635.5, -17, 0.17), (1007, -2, 0.036),
               (1060, -13.5, 0.042), (1500, 1, 0.014), (1764, -0.5, 0.017), (1970, -3, 0.018),
               (1970, -10, 0.02)]
# crack spectrum: f/Hz, level/dB
CRACK_COLOUR = [(200, -7), (900, 8), (2100, 7.5), (3000, 3.5), (5000, 1), (15000, -1.5)]


def knocks(crack_db=1, crack_t60=0.05):
    """Each blow cracks and briefly rings the wood's modes; a low-pass sets its brightness."""
    t, out = TIME[:SR // 2], np.zeros(N)
    for s, db, bright_hz in KNOCKS:
        rings = 0
        for hz, mode_db, t60 in KNOCK_MODES:
            decay = from_db(mode_db - 60 * t / t60)
            rings = rings + decay * np.sin(2 * np.pi * hz * t) * rng.choice([-1, 1])
        crack = from_db(crack_db) * burst(CRACK_COLOUR, rise_s=0.00053, t60=crack_t60)
        blow = butter(rings + crack, bright_hz, "low")
        add(out, s, from_db(db) * blow / np.abs(blow).max())
    return (from_db(-2.0) * out + from_db(1.5) * room(out)) * pan(-0.9)


# soft thuds on the floor: t/s, relative level/dB, high-pass f/Hz
THUDS = [(7.985, -43.5, 95.7), (8.023, -43.5, 101.9), (8.1, -43, 99), (8.768, -35, 65.8)]
# thud spectrum: f/Hz, level/dB
THUD_COLOUR = [(30, -42.5), (70, -1.5), (130, -4.5), (250, -17), (400, -18), (800, -32), (1700, -47),
               (3000, -47), (12000, -55.5)]


def thuds():
    """Dull low noise bursts that boom in the room."""
    out = np.zeros(N)
    for s, db, lowest_hz in THUDS:
        bump = butter(burst(THUD_COLOUR, rise_s=0.00078, t60=0.14), lowest_hz, "high")
        add(out, s, from_db(db + 3.0) * bump)
    return out + from_db(1.5) * room(out)


def scene():
    """Birds, their wings and small noises in a quiet room."""
    birds = galahs() + wings() + buffets() + claws()
    background = still_air() + handling() + metal_ring()
    return birds + background + rustles() + scuffs() + knocks() + thuds()


CUTOFF_HZ = 15750


def record(dry, ceiling=0.83, release_db_per_s=250):
    """A look-ahead limiter holds peaks down; a steep low-pass cuts the top."""
    over_db = 20 * np.log10(np.maximum(np.abs(dry).max(axis=0) / ceiling, 1))
    release_db = release_db_per_s * TIME
    held_db = np.maximum.accumulate(over_db + release_db) - release_db
    gain_db = uniform_filter1d(minimum_filter1d(-held_db, size=89), size=89)   # sizes in samples
    low_pass = signal.ellip(14, .1, 90, CUTOFF_HZ, fs=SR, output="sos")
    return signal.sosfilt(low_pass, dry * from_db(gain_db))


dry = scene()
out = record(dry)
dump_mix(out)
```